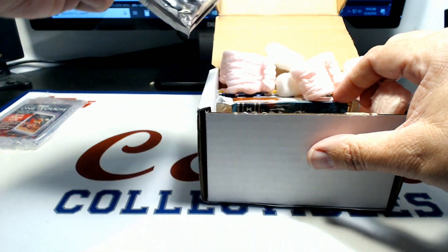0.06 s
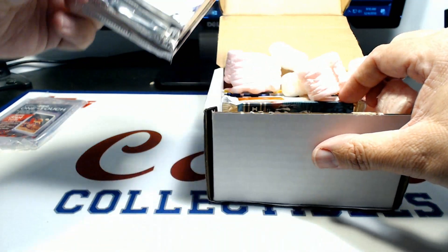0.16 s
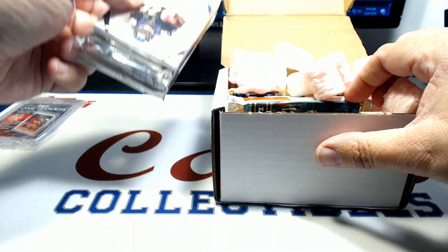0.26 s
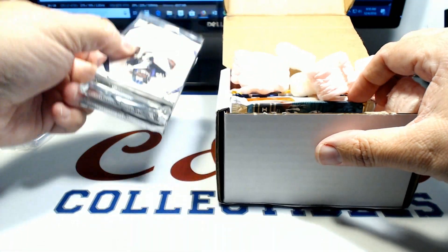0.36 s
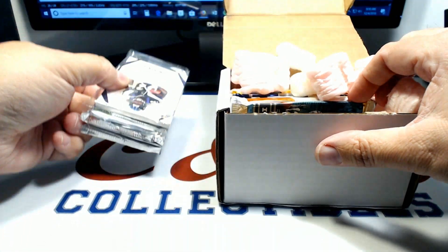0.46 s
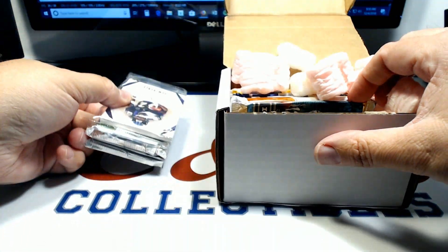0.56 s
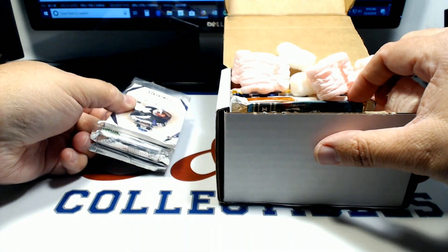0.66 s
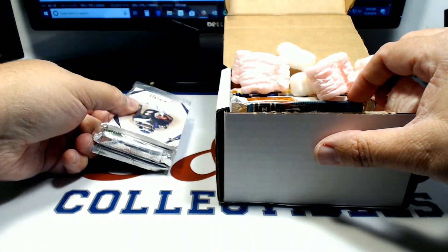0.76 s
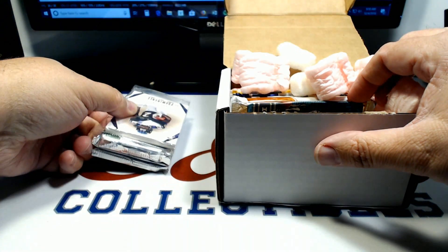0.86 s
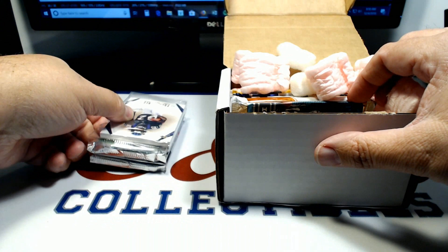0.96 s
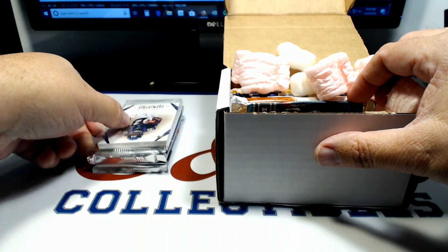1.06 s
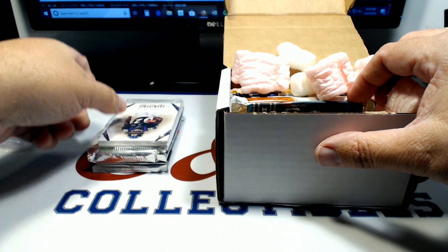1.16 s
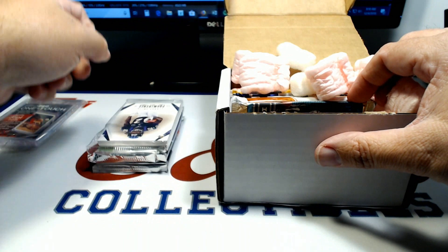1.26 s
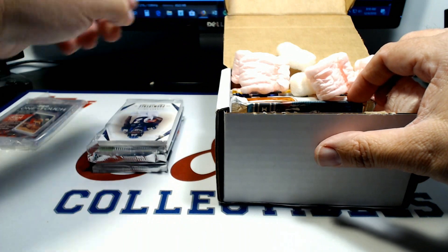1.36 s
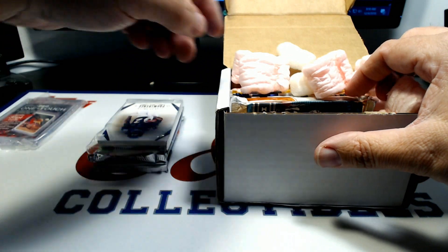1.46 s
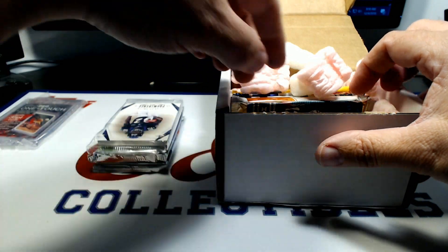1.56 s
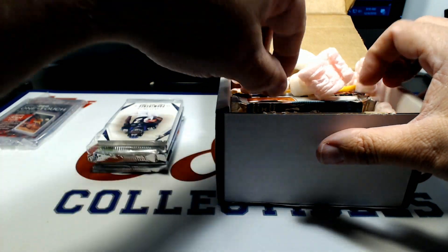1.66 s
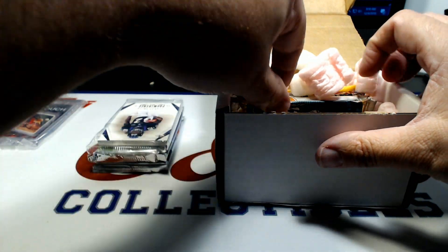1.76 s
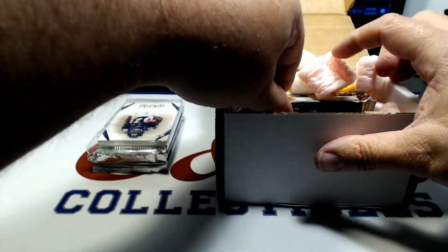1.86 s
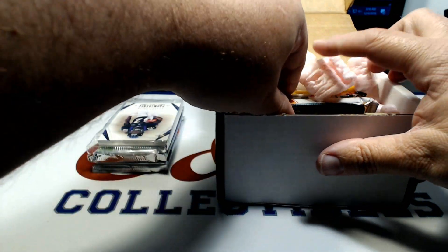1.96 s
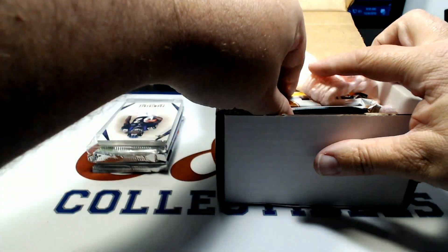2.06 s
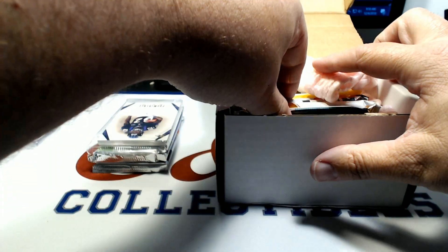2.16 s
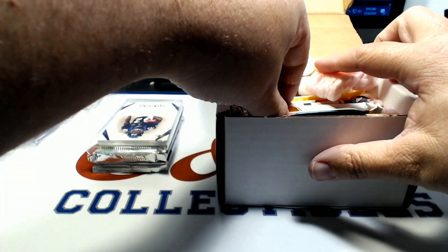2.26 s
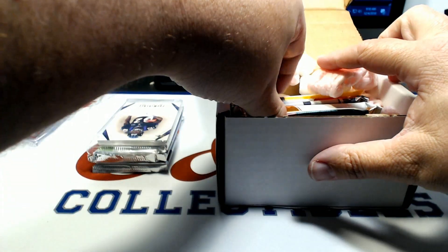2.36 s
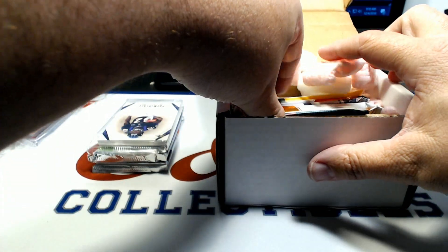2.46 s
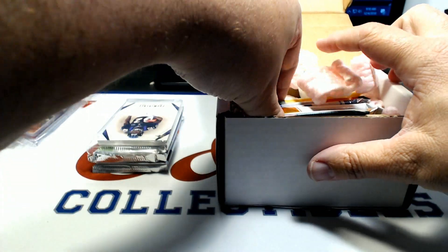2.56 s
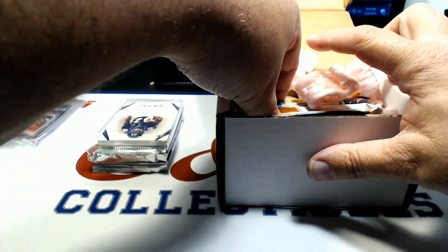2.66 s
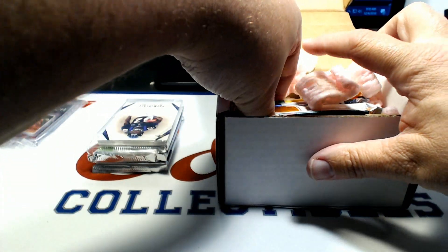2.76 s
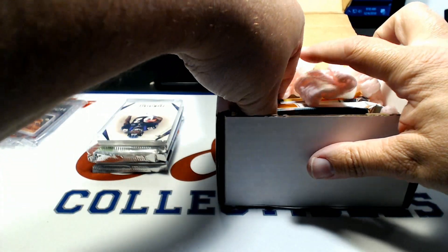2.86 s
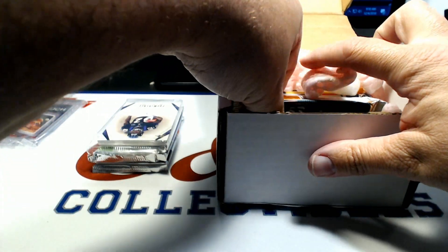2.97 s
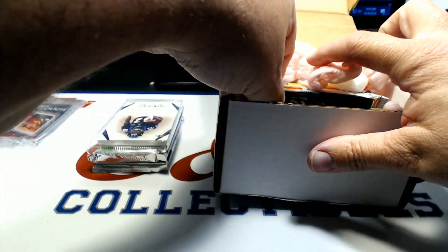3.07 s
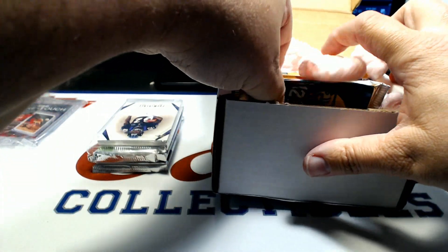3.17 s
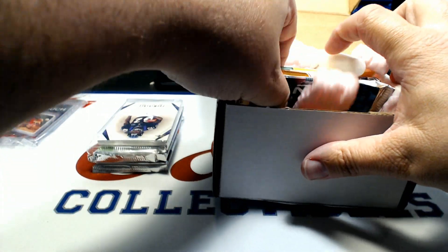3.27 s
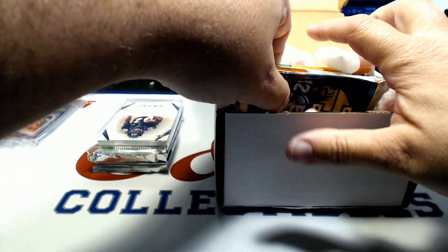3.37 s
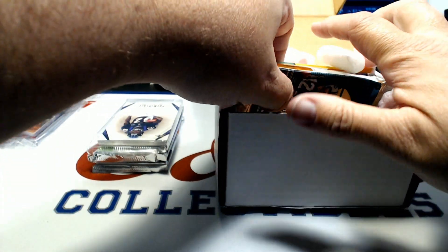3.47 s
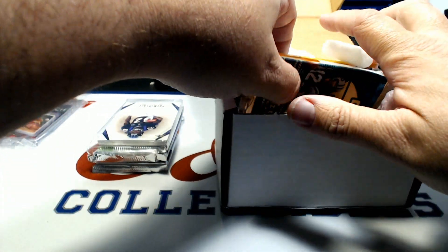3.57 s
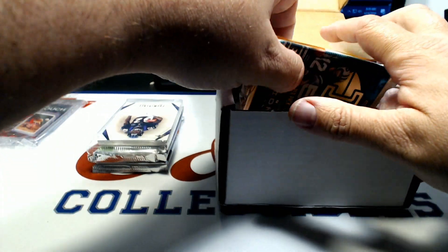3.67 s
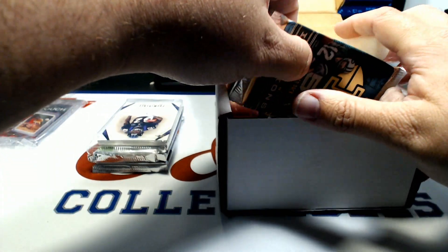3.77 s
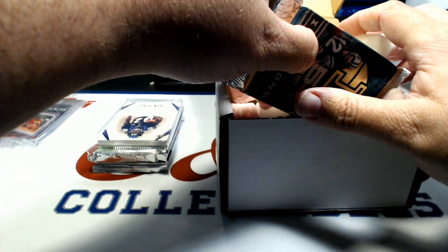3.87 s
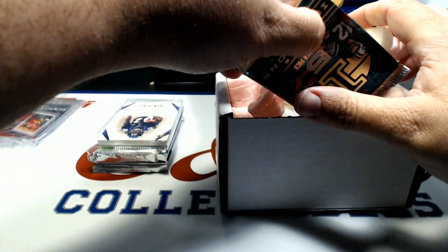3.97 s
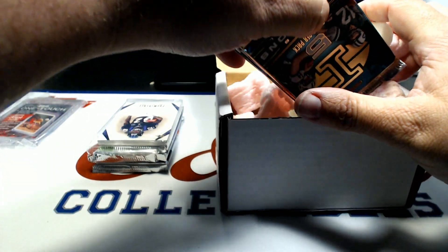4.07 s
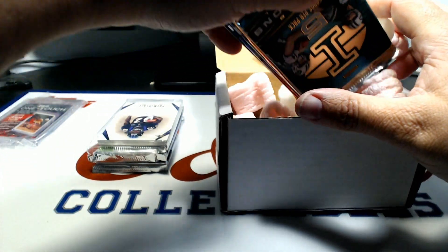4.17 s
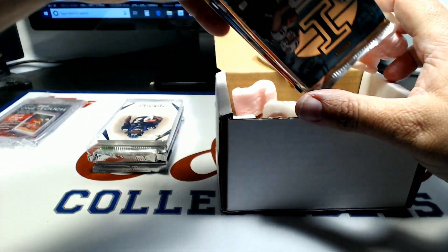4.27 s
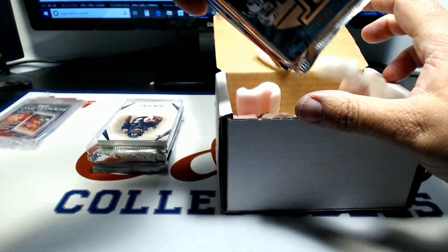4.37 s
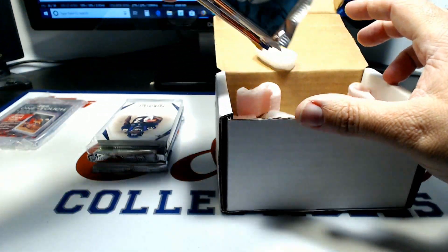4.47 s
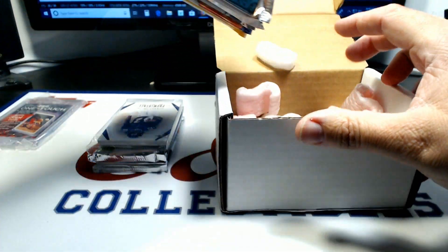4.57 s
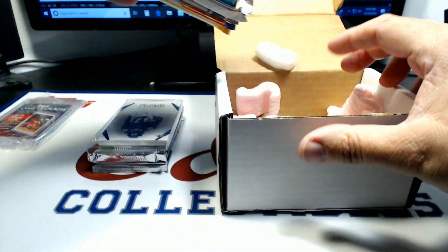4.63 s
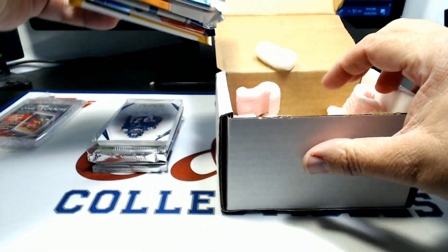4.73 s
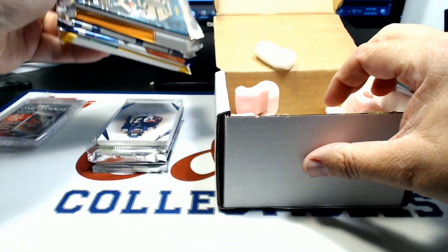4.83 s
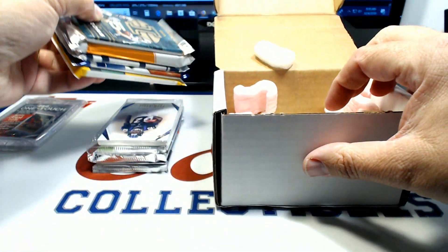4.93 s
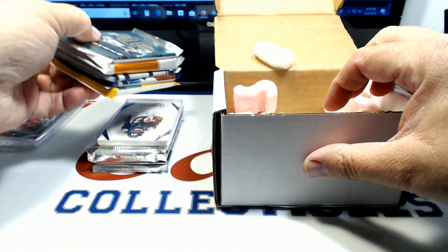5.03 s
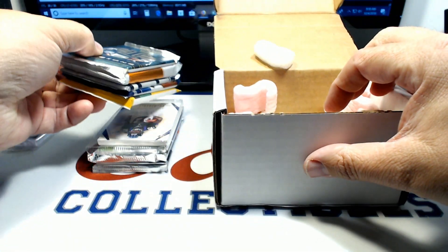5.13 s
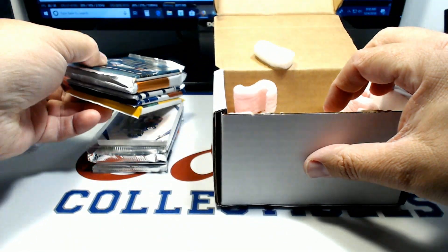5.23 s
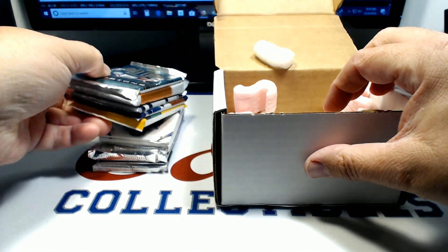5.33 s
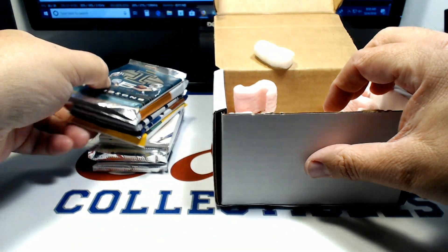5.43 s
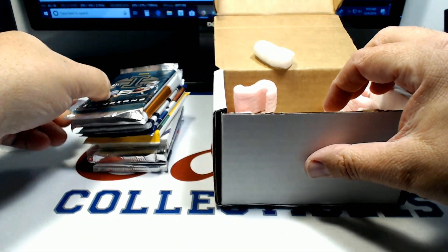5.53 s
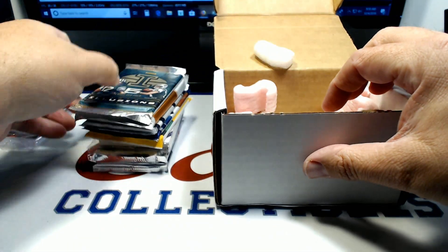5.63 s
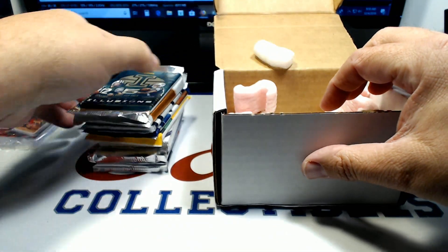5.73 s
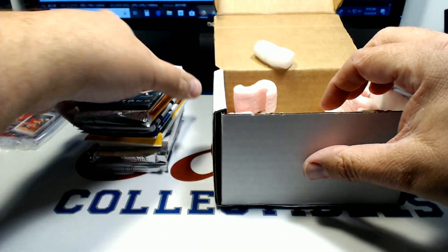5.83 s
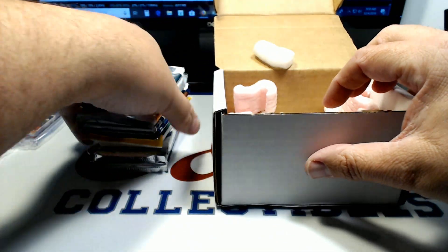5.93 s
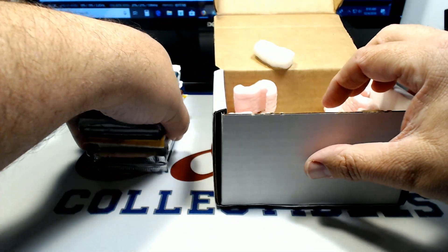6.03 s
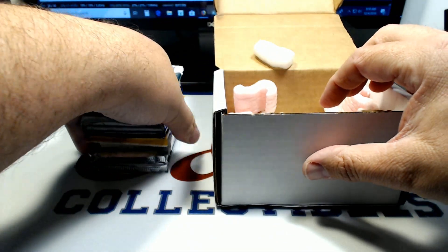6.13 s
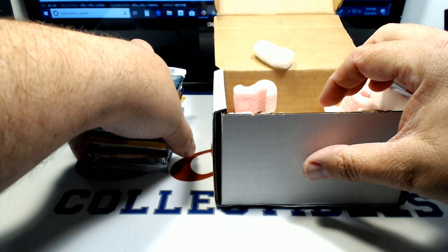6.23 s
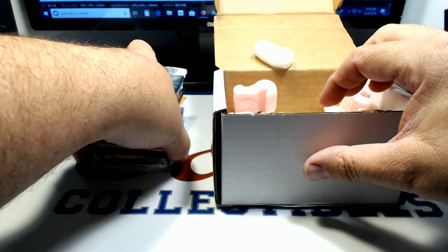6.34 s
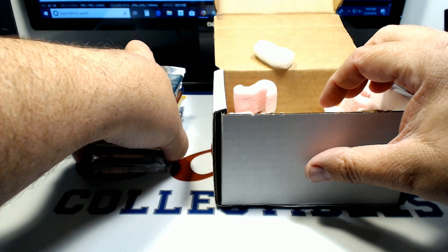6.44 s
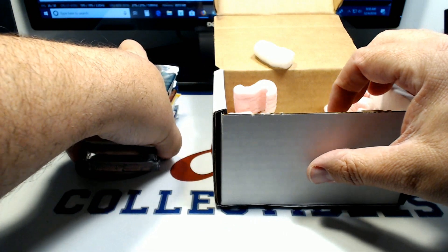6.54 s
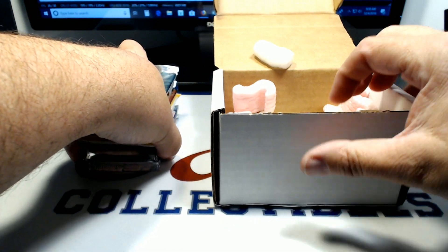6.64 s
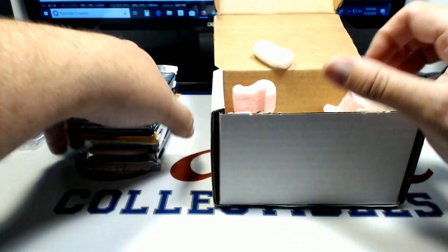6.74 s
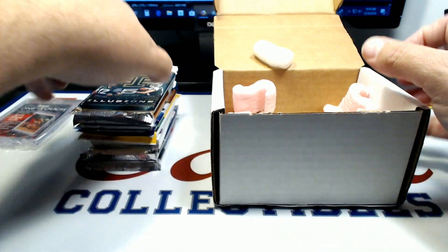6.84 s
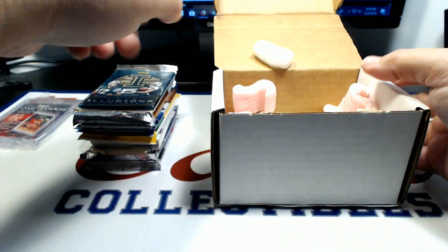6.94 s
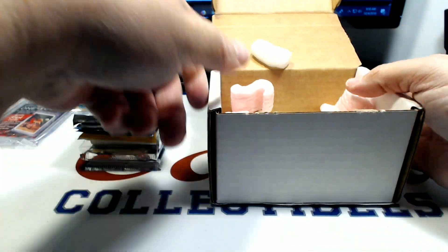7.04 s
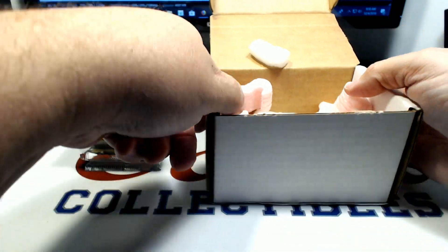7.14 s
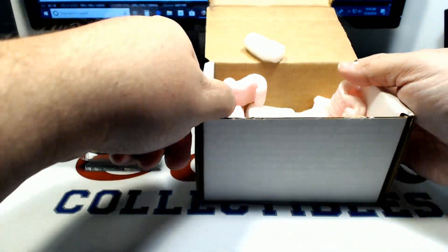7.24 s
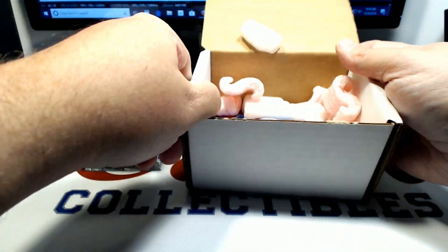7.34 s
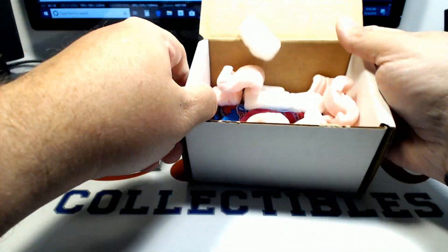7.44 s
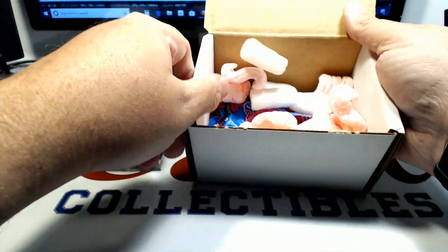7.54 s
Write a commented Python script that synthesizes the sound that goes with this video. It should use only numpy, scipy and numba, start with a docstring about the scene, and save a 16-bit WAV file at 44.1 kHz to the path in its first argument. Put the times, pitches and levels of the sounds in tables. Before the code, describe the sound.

A soft double thud, dense squeaky rustling and foil snaps in a cardboard box, a sharp clack, quieter crinkles, and a final stuttering scrape.

```python
"""In a small room with a faint computer fan, hands dig foil card packs out of a cardboard box of foam peanuts.
Foam and foil rub in dense tiny random slips, which are coloured as rustle and also ring the cardboard walls.
Short creaks and rubs are stick-slip through wavering resonances; foil snaps are a crack, noise and ticks.
Stiff packs clack, after two faint taps, as short noise in resonances; knocks are pushes into desk modes.
Packs also scrape the lid and slide on each other; the box shifts and, at the end, judders as it is dragged."""
import sys
import numpy as np
from scipy import signal
from scipy.fft import rfft, irfft
from scipy.io import wavfile
from numba import njit

SR = 44100
rng = np.random.default_rng(int(sys.argv[2]) if len(sys.argv) > 2 else 0)


def store_pcm(level_fs):
    """Save levels as 16-bit WAV."""
    pcm = np.round(np.clip(level_fs, -1, 1) * 32767).astype(np.int16)
    wavfile.write(sys.argv[1], SR, np.atleast_2d(pcm).T)


N = 335151
T = np.arange(N) / SR  # time/s

# strokes of the hand through foil and foam: [t/s, length/s, rustle level/dB, cardboard rubbing level/dB]
STROKES = [(0.042, 0.27, -69.5, -73), (0.748, 0.04, -57.5, -63.5), (0.871, 0.093, -65.5, -73),
           (0.996, 0.09, -47.5, -54.5), (1.402, 0.13, -57, -89), (1.655, 0.032, -54.5, -89),
           (1.792, 0.17, -44.5, -46), (1.879, 0.069, -44.5, -40.5), (1.961, 0.16, -38.5, -41.5),
           (2.155, 0.043, -33.5, -29.5), (2.215, 0.096, -41.5, -49), (2.326, 0.13, -41, -44),
           (2.477, 0.051, -41, -39.5), (2.615, 0.054, -43, -47), (2.641, 0.056, -38.5, -32.5),
           (2.798, 0.08, -40.5, -34), (2.917, 0.1, -43, -45.5), (3.038, 0.11, -37.5, -44),
           (3.185, 0.13, -43, -43.5), (3.386, 0.067, -61, -59.5), (3.501, 0.079, -39.5, -39.5),
           (3.566, 0.09, -43.5, -55), (3.647, 0.066, -35.5, -49.5), (3.68, 0.11, -40, -46.5),
           (3.8, 0.15, -50.5, -61), (4.13, 0.038, -48, -44.5), (4.291, 0.023, -55, -77.5),
           (4.356, 0.16, -64, -71), (5.247, 0.05, -83, -54.5), (5.336, 0.2, -51.5, -62),
           (5.429, 0.067, -38.5, -42), (5.898, 0.11, -52, -64.5), (6.06, 0.064, -46, -88),
           (6.168, 0.069, -51, -63), (6.243, .13, -56.5, -52.5), (6.415, 0.12, -48.5, -61.5),
           (6.63, 0.019, -44, -68), (6.649, 0.03, -38.5, -46), (6.926, 0.1, -65.5, -71),
           (7.008, 0.09, -46, -49), (7.078, 0.093, -47.5, -43), (7.172, 0.19, -48.5, -45),
           (7.258, 0.066, -40, -40), (7.338, 0.16, -47, -51.5), (7.417, 0.41, -50, -44.5)]
# fingers that stay in the box keep stirring faintly: [t/s, length/s, rustle level/dB, rubbing level/dB]
RESTING_FINGERS = (1.4, 4, -72.5, -69)
HAND_MOVES = STROKES + [RESTING_FINGERS]
# resonances of the cardboard walls: [f/Hz, width/Hz, level/dB]
WALL_RESONANCES = [(319.4, 67, -1), (700, 190, -7), (1037, 190, -0.5), (1316, 140, -1), (1555, 110, -0.5),
                   (1914, 95, -2), (2684, 150, -1.5)]


def rustle():
    """Foam and foil give way in tiny slips; the level of each frequency band wanders by itself."""
    # spectrum of the rustle: [f/Hz, density/dB per Hz]
    rustle_spectrum = [(400, -18), (1000, -13.5), (1900, 2.5), (2900, 4.5), (4300, 9), (6500, 3.5),
                       (10700, 1.5), (12500, -5.5), (16000, -33.5)]
    crackle = unit(colour(grains(rate=4200, spread_db=2.0), rustle_spectrum))
    patchy = np.zeros(N)
    below = 0
    for edge_hz in np.geomspace(1200, 11000, num=12):
        up_to_edge = signal.sosfiltfilt(signal.butter(6, edge_hz, fs=SR, output="sos"), crackle)
        patchy += (up_to_edge - below) * undb(4.5 * walk(40))
        below = up_to_edge
    patchy += (crackle - below) * undb(4.5 * walk(40))
    pressure = effort([(start, length, db) for start, length, db, _ in HAND_MOVES])
    return unit(patchy * undb(2.2 * walk(110))) * pressure


def rubbing():
    """Peanuts catch and slip against the box, ringing its walls and faintly the desk."""
    force = grains(rate=1100, spread_db=1.0) * undb(4.5 * walk(70))
    ringing = np.zeros(N)
    for hz, width, db in WALL_RESONANCES:
        # the touching fingers damp, free and detune each resonance in turn
        centre = hz * np.exp(0.055 * walk(25))
        ringing += sweep(force, centre, hz / width) * undb(db + 3.2 * walk(25))
    walls = unit(lowpass(ringing, hz=2780))
    desk = unit(signal.fftconvolve(force, desk_ring())[:N])
    pressure = effort([(start, length, db) for start, length, _, db in HAND_MOVES])
    return pressure * (undb(1.12) * walls + undb(-19.5) * desk)


def snaps(free_decay_s=0.0066, damped_decay_s=0.002, settle_s=0.012, rise_s=0.00095,
          crack_db=2, ring_db=-21, ring_t60_s=0.059, facet_db=5.0, gain_db=3.0):
    """A foil facet buckles: a sharp crack, crinkling noise and a brief ring, then small settling ticks."""
    # wrapper snaps, before the common gain and tilt offsets:
    # [t/s, level/dB, low body relative level/dB, top sizzle relative level/dB]
    snap_events = [(0.398, -52, -30, -22), (0.5873, -45, -40, -0.5), (0.819, -43, -16, 0),
                   (0.9304, -41.5, -9.5, -18), (1.029, -26.5, 3, -12.5), (1.0378, -22.5, -1.5, -6),
                   (1.1145, -35, -14, -7), (1.7449, -40.5, -59, -1.5), (1.9832, -29.5, -31, 0),
                   (2.0414, -30, -25, -8.5), (2.0931, -22, -6, -1), (2.17, -22, 3.5, -3),
                   (2.387, -28.5, -4, -4.5), (2.525, -27.5, -3, -17), (2.7548, -28.5, -2, -5),
                   (2.8506, -28.5, -12, -9), (3.1204, -31, -7, -13), (3.1905, -26.5, -11.5, 2),
                   (3.2289, -20.5, -1, -16), (3.4292, -34.5, -26, -9.5), (3.518, -44.5, -7, 16),
                   (3.782, -26, -20.5, -1), (3.8948, -26.5, -8, -5), (3.9321, -33, -12.5, 4.5),
                   (4.142, -37.5, 4.5, 10), (4.7043, -30, -21, -7), (4.8341, -35.5, -16.5, -18.5),
                   (4.907, -46.5, -25, -11), (5.0485, -49.5, -13, -11), (5.2867, -37, -18, -40.5),
                   (5.331, -36.5, -31, -11), (5.361, -35.5, -32, -4), (5.384, -35.5, -19, -7),
                   (5.407, -39.5, -18, -2), (5.4333, -24.5, -3, -16), (5.444, -28, -23, -2.5),
                   (5.509, -28, -18.5, -4.5), (5.5626, -35, -16.5, -18), (5.6008, -34.5, -7, -20),
                   (5.909, -34, -24, -16), (6.238, -28.5, -13, -14.5), (6.267, -27.5, -9.5, -14),
                   (6.294, -25, -10, -13.5), (6.338, -29.5, -8, -12.5), (6.409, -38, -15, -5),
                   (6.4609, -34, -9, -1), (6.508, -25.5, -19, -20.5), (6.5537, -35, -9, -20),
                   (6.657, -26.5, -17.5, -6), (6.7032, -32.5, -5, -16), (6.747, -35, -9, 1)]
    # common spectrum of the snaps: [f/Hz, density/dB per Hz]
    snap_spectrum = [(250, -23), (600, -9), (1100, 5), (2000, 2), (4200, 1.5), (7000, 3.5), (10800, 3.5),
                     (13000, -9), (16000, -30.5)]
    # while the packs lie in the box, the foam damps their foil: [from t/s, to t/s]
    in_box = (1.7, 4.0)
    out = np.zeros(N + SR)
    t = T[:SR // 10]
    hz, base = np.transpose(snap_spectrum)
    grid = np.geomspace(hz[0], hz[-1], num=32)
    for start, db, body, sizzle in snap_events:
        ticks = (rng.random(len(t)) < 400 / SR) * rng.standard_normal(len(t))
        decay_s = damped_decay_s if in_box[0] < start < in_box[1] else free_decay_s
        # a shorter crinkle is louder, which keeps its energy
        crinkle = rng.standard_normal(len(t)) * np.exp(-t / decay_s) * np.sqrt(free_decay_s / decay_s)
        settling = undb(12.5) * ticks * np.exp(-t / settle_s)
        ring_hz = np.exp(rng.uniform(np.log(1300), np.log(5000), size=(3, 1)))
        ring = np.sin(2 * np.pi * ring_hz * t).sum(axis=0) * undb(ring_db - 60 * t / ring_t60_s)
        burst = (crinkle + settling + ring) * (1 - np.exp(-t / rise_s))
        burst[0] += 2 * undb(crack_db)
        tilt_hz, tilt_db = [1340, 2840, 4440, 8060], [body + 4, 0, 0, sizzle - 1.5]
        tilt = np.interp(np.log(grid), np.log(tilt_hz), tilt_db)
        # every facet has its own resonances
        facet = facet_db * rng.uniform(-1.39, 1, len(grid))
        shape = np.interp(np.log(grid), np.log(hz), base) + tilt + facet
        i = int(start * SR)
        out[i:i + len(t)] += undb(db + gain_db) * colour(burst, np.c_[grid, shape])
    return out[:N]


def creaks(slip_rate=400, sharpness=5.9, wander=0.043, overtone=1.3, overtone_db=-4, fade_db=6):
    """Short creaks and rubs stick and slip, hundreds of times a second, into two wavering resonances."""
    # short creaks and rubs of foam on cardboard, one a woody touch (1.531 s), one a low rub (6.466 s):
    # [t/s, length/s, level/dB, resonance f/Hz]
    creak_events = [(1.531, 0.016, -50, 864), (1.796, 0.077, -35.5, 1270), (1.891, 0.009, -34.5, 910),
                    (1.913, 0.01, -34.5, 1020), (2.625, 0.013, -38, 1435), (3.257, 0.064, -42, 896),
                    (3.532, 0.023, -33.5, 1007), (3.71, 0.052, -43, 960), (5.914, 0.0077, -43, 1350),
                    (6.466, 0.021, -50, 290), (7.089, 0.025, -39.5, 1650), (7.132, 0.028, -39, 1150),
                    (7.287, 0.035, -32.5, 990), (7.453, 0.023, -40.5, 860)]
    out = np.zeros(N)
    waver = np.exp(wander * walk(60))
    for start, length, db, hz in creak_events:
        inside = (T > start) & (T < start + length)
        fade = undb(-fade_db * np.clip((T - start) / length, 0, 1))
        pulses = slips(start, slip_rate, jitter=0.27, scatter_db=3.0) * inside * fade
        centre = hz * waver
        sound = sweep(pulses, centre, float(sharpness))
        sound = sound + undb(overtone_db) * sweep(pulses, overtone * centre, float(sharpness))
        band_hz = [hz * 2 / 3, min(hz * 2, 2100)]
        sound = signal.sosfilt(signal.butter(4, band_hz, "band", fs=SR, output="sos"), sound)
        out += undb(db) * sound / (np.std(sound[inside]) + 1e-9)
    return out


def clacks(contact_s=0.0035, sharpness=9):
    """Clacks of stiff packs, and two faint early taps: short noise through a few resonances."""
    # two faint early taps, then clacks of stiff packs: [t/s, peak level/dB, lowest resonance f/Hz]
    clack_events = [(0.149, -46, 1790), (0.7, -47, 1550), (2.7806, -16.5, 1700), (4.708, -32.5, 1600),
                    (4.942, -41, 2120), (5.331, -33, 1370), (5.362, -34.5, 1250)]
    # resonances of each clack or tap: [multiple of the lowest, level/dB]
    clack_modes = [(1, 1), (1.6, -1), (2.16, -12)]
    out, t = np.zeros(N + SR), T[:SR // 10]
    for start, db, hz in clack_events:
        contact = rng.standard_normal(len(t)) * np.exp(-t / contact_s)
        peaks = [(hz * k, hz * k / sharpness, mode_db) for k, mode_db in clack_modes]
        ring = resonate(contact, peaks)
        i = int(start * SR)
        out[i:i + len(t)] += undb(db) * ring / np.abs(ring).max()
    return out[:N]


def knocks(gain_db=3, bass_hz=150):
    """Each knock is a rounded push; a longer contact sounds duller and moves more of the desk."""
    # soft knocks of packs and box on the desk: [t/s, peak level before the common gain/dB, contact time/ms]
    knock_events = [(0.141, -49, 2.2), (0.775, -49.5, 2.3), (0.923, -48, 0.61), (1.018, -35.5, 2.7),
                    (1.026, -13.5, 5.8), (1.035, -11, 2.35), (1.198, -50, 3.3), (1.537, -42.5, 1.86),
                    (1.681, -46, 3.3), (1.762, -37, 2.3), (1.899, -33, 2.1), (2.093, -29.5, 2.2),
                    (2.17, -20.5, 3.4), (2.181, -26, 1.7), (2.193, -23, 2.9), (2.6289, -21.5, 2.8),
                    (2.667, -20, 3.4), (2.731, -31.5, 3.3), (3.03, -39, 0.47), (3.788, -33.5, 1.2),
                    (5.436, -40.5, 0.76), (6.365, -34.5, 4.2), (6.47, -46.5, 1.1), (6.936, -38, 5.3),
                    (7.402, -31, 2.9)]
    out, ring = np.zeros(N + SR), desk_ring()
    t_ms = 1000 * T[:512]
    for start, db, contact_ms in knock_events:
        push = np.sin(np.pi * np.minimum(t_ms / contact_ms, 1)) ** 2
        thud = signal.fftconvolve(ring, push)
        # the low cut is bass_hz for a contact of 1 ms, lower for longer ones
        thud = signal.sosfilt(signal.butter(2, bass_hz / contact_ms, "high", fs=SR, output="sos"), thud)
        i = int(start * SR)
        out[i:i + len(thud)] += undb(db + gain_db) * thud / np.abs(thud).max()
    return out[:N]


def desk_ring(tail_db=-24, tail_t60_s=0.29):
    """The low ring after one push: the hand damps most of it at once, the desk top hums on weakly."""
    # modes of the box on the desk: [f/Hz, level/dB, main decay t60/s]
    desk_modes = [(132, -7, 0.12), (179, -6.5, 0.14), (225.7, 7.5, 0.15), (268.3, 9, 0.073),
                  (303, 14.5, 0.063), (413.6, -0.5, 0.11), (620, -8.5, 0.059)]
    t = T[:SR // 2]
    tail = undb(tail_db - 60 * t / tail_t60_s)
    ring = np.zeros(len(t))
    for hz, db, t60 in desk_modes:
        ring += undb(db) * (undb(-60 * t / t60) + tail) * np.sin(2 * np.pi * hz * t)
    return ring


def scrapes():
    """The four sliding sounds together: lid rasp, box rumble, box judder and foil hiss."""
    return lid_scrape() + box_shifts() + box_drag() + pack_slide()


def lid_scrape():
    """The stack scrapes past the lid: fast uneven slips ring it, and the scraped edge rises in pitch."""
    # resonances of the lid: [f/Hz, width/Hz, level/dB]
    lid_resonances = [(311, 34, 8), (654, 130, -13), (1610, 50, -8), (2415, 88, 4)]
    start, length, db = 4.414, 0.091, -31.5  # s, s, dB
    catches = slips(start, rate=310, jitter=0.25, scatter_db=3) * (T < start + length)
    # the edge rings higher, by 2800 Hz per s, as the contact slides along it
    edge_hz = 844 + 2800 * np.clip(T - start, 0, length)
    edge = sweep(catches, edge_hz, 5.5)
    rasp = lowpass(resonate(catches, lid_resonances) + undb(5.5) * edge, hz=1850, order=6)
    return played(rasp, [(start, length, db)])


def box_shifts():
    """The box shifts on the mat: sparse slips rumble through the modes of box and desk."""
    # shifts of the box: [t/s, length/s, level/dB]
    shift_strokes = [(1.806, 0.22, -46), (2.695, 0.082, -45.5), (7.056, 0.12, -40.5), (7.269, 0.079, -33.5),
                     (7.435, 0.26, -38.5)]
    rumble = signal.fftconvolve(grains(rate=410, spread_db=2), desk_ring())[:N]
    return played(rumble, shift_strokes)


def box_drag():
    """The box is dragged over the mat in nearly regular stick-slip steps that ring it low."""
    start, length, db = 7.4685, 0.25, -31  # s, s, dB
    steps = slips(start, np.full(N, 56.5), jitter=0.02, scatter_db=1)
    body = lowpass(resonate(steps, [(224, 49, 0)]), hz=580)
    # each step also shakes the cardboard walls
    walls = lowpass(resonate(steps, WALL_RESONANCES), hz=1400)
    return played(unit(body) + undb(-16) * unit(walls), [(start, length, db)])


def pack_slide():
    """One smooth pack slides on another: very dense slips merge into a hiss, with a push on the way."""
    # spectrum of the slide: [f/Hz, density/dB per Hz]
    slide_spectrum = [(2500, -23), (4200, -9), (5100, 0.5), (6500, -4), (8200, -10), (10000, -14),
                      (15000, -37)]
    slide, push = (4.008, 0.25, -48.5), (4.135, 0.055, -36.5)  # s, length in s, dB
    hiss = colour(grains(rate=25000, spread_db=3.1), slide_spectrum)
    return played(hiss, [slide, push])


def fan():
    """The computer fan: nearly steady air noise with two tones that waver in pitch."""
    # spectrum of the air noise: [f/Hz, density/dB per Hz]
    air_spectrum = [(30, -26), (87, -9), (230, 0), (350, -5), (520, -22), (780, -16), (920, -22),
                    (1300, -21), (2600, -30), (5000, -32), (10000, -38), (15000, -54)]
    # tones of the fan: [f/Hz, level/dB]
    tones = [(200, -65.5), (776, -74)]
    out = undb(-65 + 0.65 * walk(2)) * unit(colour(rng.standard_normal(N), air_spectrum))
    for hz, db in tones:
        phase = 2 * np.pi * np.cumsum(hz + 7 * walk(30)) / SR
        out += undb(db) * np.sin(phase)
    return out


def room(x, early_db=-9, early_t60_s=0.028, late_db=-19, late_t60_s=0.072):
    """Quick reflections from desk, lid and screen, then a weak dull tail, both as decaying noise."""
    t = np.arange(SR // 2) / SR
    early = rng.standard_normal(len(t)) * undb(-60 * t / early_t60_s) * (t > 0.001)
    late = lowpass(rng.standard_normal(len(t)), hz=5660) * undb(-60 * t / late_t60_s) * (t > 0.008)
    echo = undb(early_db) * early / np.linalg.norm(early) + undb(late_db) * late / np.linalg.norm(late)
    # these small surfaces hardly reflect the bass
    echo = signal.sosfilt(signal.butter(2, 450, "high", fs=SR, output="sos"), echo)
    return x + signal.fftconvolve(x, echo)[:N]


def grains(rate, spread_db):
    """Tiny slips at random moments (rate per s), of random sign and unequal size."""
    hit = rng.random(N) < rate / SR
    return hit * rng.choice([-1, 1], N) * undb(spread_db * np.minimum(rng.exponential(size=N), 5))


def slips(start, rate, jitter, scatter_db):
    """Stick-slip: one pulse each time the contact lets go, unevenly spaced."""
    phase = np.cumsum(rate * np.exp(jitter * walk(np.mean(rate))) * (T > start)) / SR
    return np.diff(np.floor(phase), prepend=0) * undb(scatter_db * rng.standard_normal(N))


def effort(strokes, attack_s=0.021, swell_db=3.5, release_db_per_s=435.5):
    """Gain of strokes (s, length, dB): each takes hold, swells towards its middle, then lets go."""
    power = np.zeros(N)
    for start, length, db in strokes:
        span = slice(int(start * SR), int((start + length + 0.2) * SR))
        t = np.maximum(T[span] - start, 0)
        arch = swell_db * (2 * np.minimum(t / length, 1) - 1) ** 2
        release = release_db_per_s * np.maximum(t - length, 0)
        power[span] += (np.minimum(t / attack_s, 1) * undb(db - arch - release)) ** 2
    return np.sqrt(power)


def played(x, strokes):
    """Let a sound be heard during its strokes, at their levels."""
    inside = (T > strokes[0][0]) & (T < strokes[-1][0] + strokes[-1][1])
    return x / np.std(x[inside]) * effort(strokes)


def walk(rate):
    """Random wander with spread near 1: straight lines between `rate` random values per s."""
    knots = rng.standard_normal(8192)
    return np.interp(T * rate, np.arange(len(knots)), knots)


def colour(x, points):
    """Causal minimum-phase filter through (Hz, dB) points, by way of the cepstrum."""
    hz, db = np.transpose(points)
    size = 2048
    f = np.maximum(np.arange(size // 2 + 1) * SR / size, 1)
    cepstrum = irfft(np.log(undb(np.interp(np.log(f), np.log(hz), db))))
    # fold the cepstrum onto positive time
    cepstrum[1:size // 2] *= 2
    cepstrum[size // 2 + 1:] = 0
    impulse = irfft(np.exp(rfft(cepstrum)))
    return signal.fftconvolve(x, impulse)[:len(x)]


def resonate(x, peaks):
    """Parallel resonances (Hz, width in Hz, dB)."""
    return sum(undb(db) * signal.lfilter(*signal.iirpeak(hz, hz / width, SR), x) for hz, width, db in peaks)


@njit
def sweep(x, hz, sharpness):
    """Band-pass as a state-variable filter whose centre moves with every sample."""
    y, band, low = np.empty(len(x)), 0., 0.
    for i in range(len(x)):
        g = np.tan(np.pi * hz[i] / SR)
        v = (band + g * (x[i] + 1e-18 - low)) / (1 + g * (g + 1 / sharpness))
        band, low, y[i] = 2 * v - band, low + 2 * g * v, v / sharpness
    return y


def lowpass(x, hz, order=2):
    """Butterworth low-pass."""
    return signal.sosfilt(signal.butter(order, min(hz, SR / 2 - 1), fs=SR, output="sos"), x)


def undb(db):
    """Decibels to gain."""
    return 10 ** (np.asarray(db) / 20)


def unit(x):
    """Scale to rms 1."""
    return x / np.sqrt(np.mean(x ** 2) + 1e-20)


def scene():
    """All the handling in the room, over the fan."""
    handling = rustle() + rubbing() + snaps() + creaks() + clacks() + knocks() + scrapes()
    return (room(handling) + fan())[None]


def record(dry):
    """A small, close microphone that drops the deep bass and cuts sharply above 16 kHz."""
    thin = signal.sosfilt(signal.butter(6, 76, "high", fs=SR, output="sos"), dry)
    return signal.sosfilt(signal.ellip(8, 0.2, 70, 16000, fs=SR, output="sos"), thin)


dry = scene()
out = record(dry)
store_pcm(out)
```